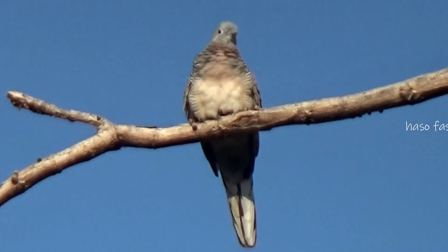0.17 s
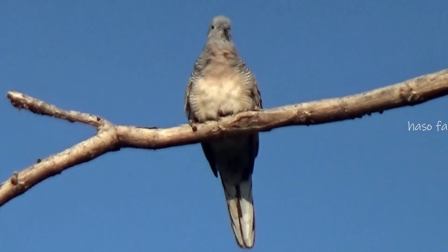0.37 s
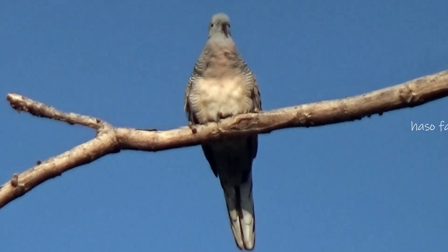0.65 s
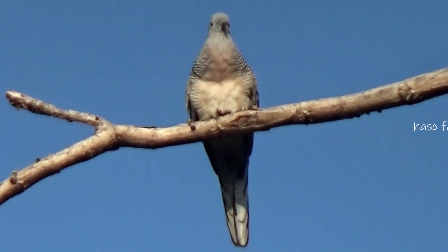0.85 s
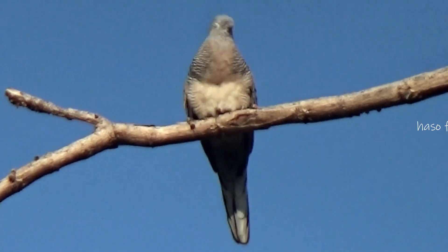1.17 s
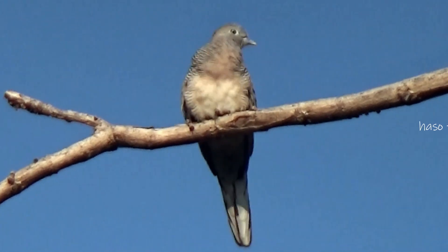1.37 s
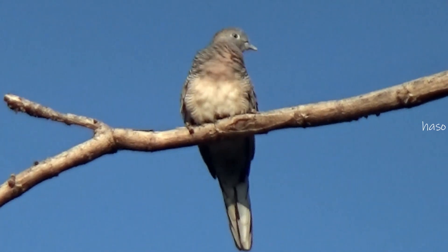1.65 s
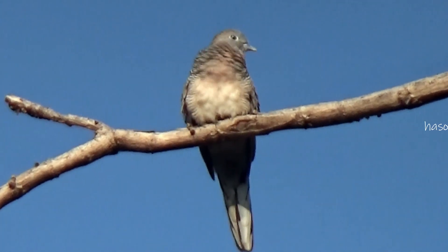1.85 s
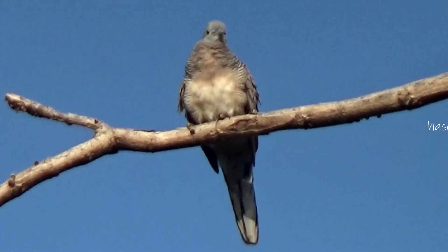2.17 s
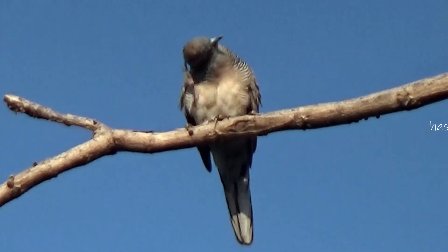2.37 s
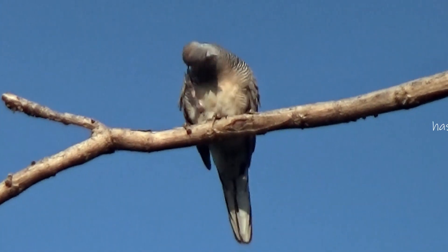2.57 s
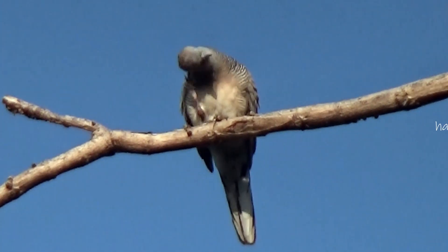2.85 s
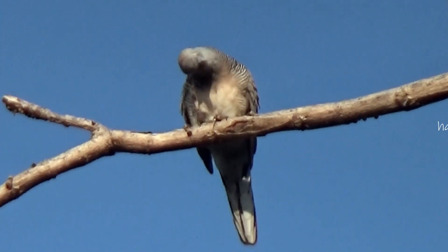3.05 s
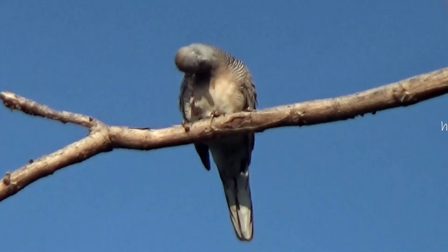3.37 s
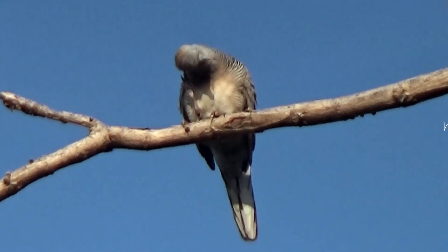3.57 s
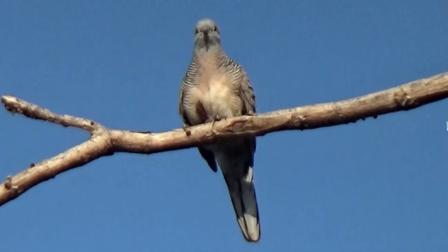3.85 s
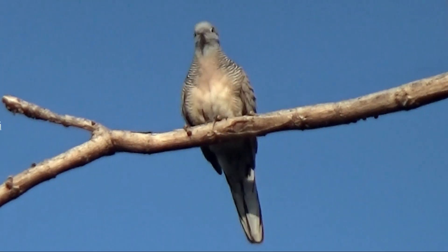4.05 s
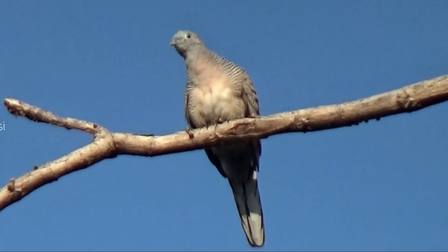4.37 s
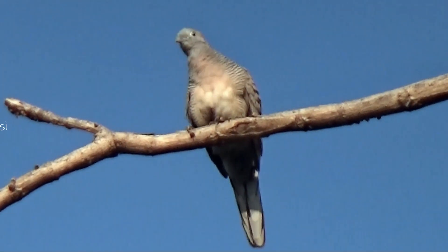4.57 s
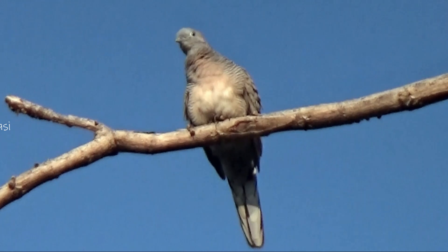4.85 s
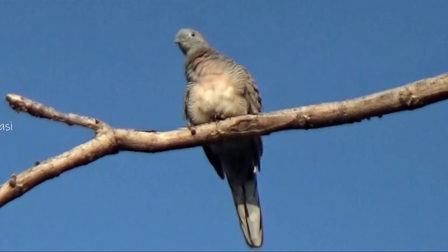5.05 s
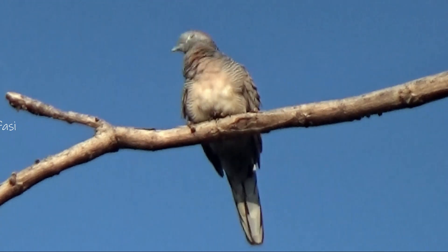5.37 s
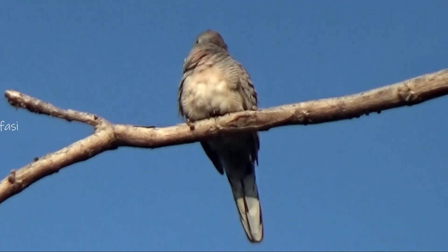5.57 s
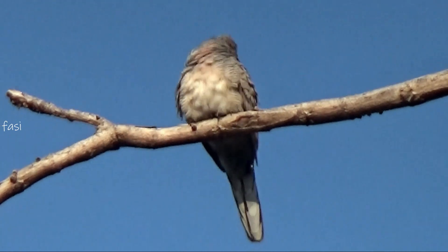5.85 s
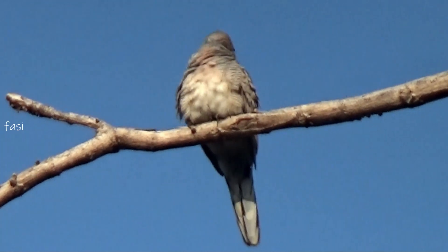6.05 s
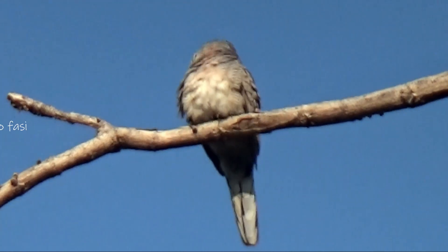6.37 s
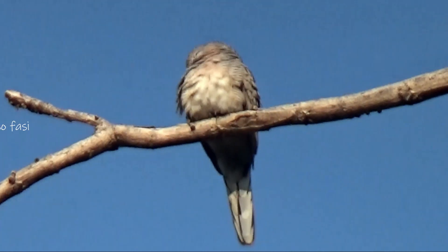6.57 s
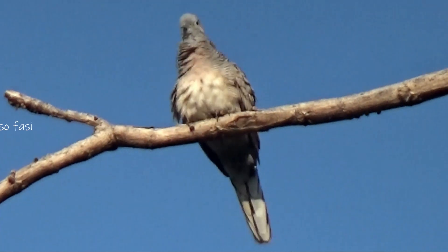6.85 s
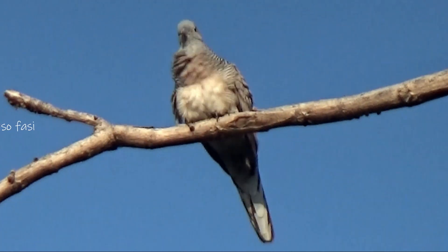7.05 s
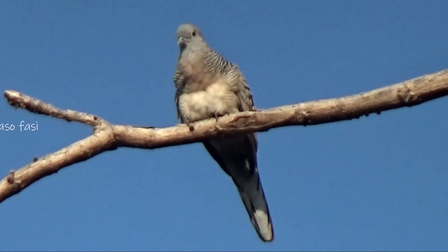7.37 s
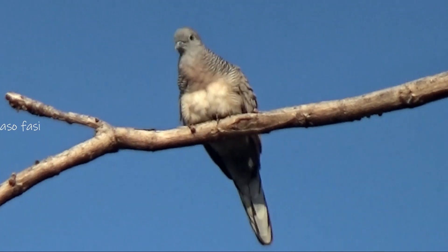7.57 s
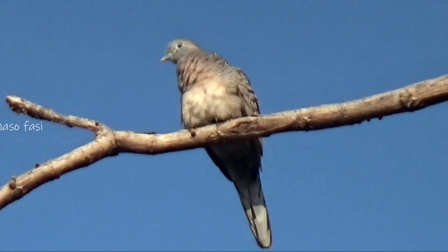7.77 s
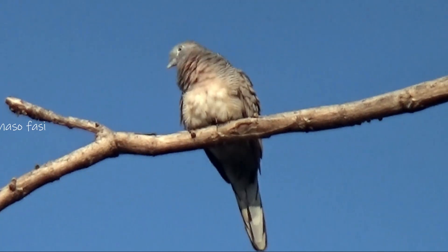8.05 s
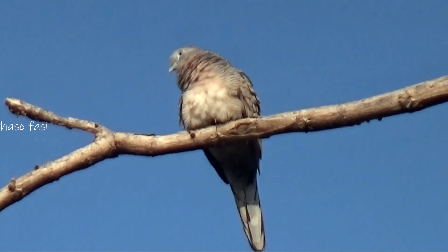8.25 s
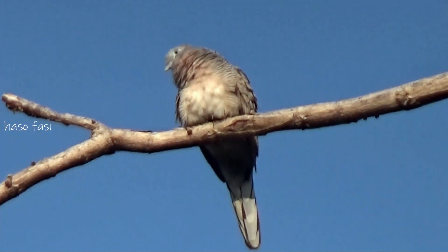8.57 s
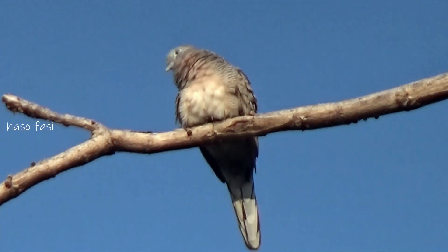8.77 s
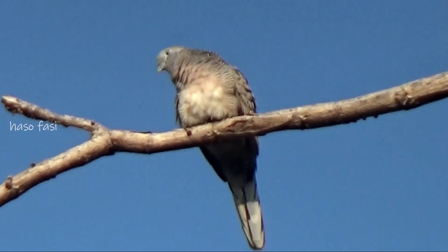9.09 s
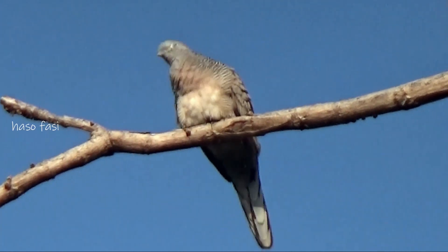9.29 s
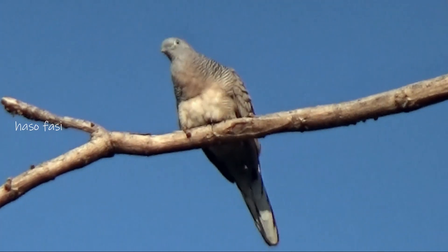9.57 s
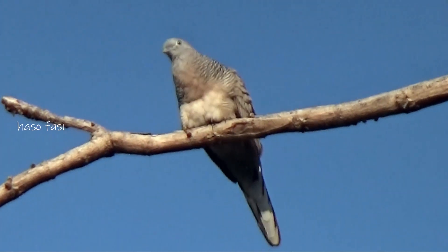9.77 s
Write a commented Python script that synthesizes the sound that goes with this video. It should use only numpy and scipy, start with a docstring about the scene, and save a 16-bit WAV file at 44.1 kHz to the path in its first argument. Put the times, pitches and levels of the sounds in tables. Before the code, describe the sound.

A near zebra dove gives three short, clear phrases, one early and two late, each a fluttering trill, several clipped notes and a longer final coo. A second dove answers twice, faintly from afar. Tiny birds chip and slide, insects rasp in even pulses, over soft outdoor air with a faint low traffic drone. The dove sounds close and dry, the rest softly scattered by trees.

```python
"""Zebra doves among trees

A near zebra dove coos three quick phrases and a second one calls twice from far off, each note a bent, almost pure tone.
Small birds chip, slide and whistle as gliding tones; insects rasp in pulses of coloured noise.
Blurred swells of filtered noise come from afar, over a steady outdoor wash and a low traffic drone."""
import sys
import numpy as np
from scipy import signal
from scipy.fft import rfft, irfft
from scipy.io import wavfile
from scipy.ndimage import uniform_filter1d

SR = 44100
rng = np.random.default_rng(int(sys.argv[2]) if len(sys.argv) > 2 else 0)


def wav_out(sig):
    """Save sig, one row per channel (or a flat mono array), as 16-bit PCM at SR to the path in sys.argv[1]."""
    wavfile.write(sys.argv[1], SR, np.round(np.clip(np.atleast_2d(sig).T, -1, 1) * 32767).astype(np.int16))


N = 437472
TIME = np.arange(N) / SR

# Colour of the still air. Each row: frequency in Hz, relative density in dB.
AIR = [(15, -27), (25, 1), (144, -1), (193, -4.5), (267, -9), (919, -13.5), (1900, -18.5), (2230, -15.5),
       (2770, -16.5), (3170, -10.5), (5580, -16.5), (7300, -21.5), (8350, -21), (11200, -31),
       (15500, -40.5)]
# Stereo width of every diffuse noise. Each row: frequency in Hz, side against middle in dB.
WIDTH = [(30, -43), (80, -47), (170, -17.5), (350, -9), (900, -4), (3000, -10.5), (6000, -12),
         (9000, -26.5), (13000, -50)]
# Swell of the distant traffic, before its trim. Each row: time in seconds, level in dB.
DRONE = [(0.0, -52.5), (1.85, -65), (2.02, -49), (6.13, -53), (6.19, -46), (9.92, -53)]
# Colour of the traffic drone. Each row: frequency in Hz, relative density in dB.
DRONE_COLOUR = [(60, -43), (105, -7), (131, 5), (160, -18.5), (300, -39.5)]
# Blurred far-off calls and bumps. Each row: start in seconds, fade length in seconds, centre in Hz,
# width in octaves, level in dB before the scatter.
FAR_SOUNDS = [(2.69, .15, 816, 0.67, -43.5), (3.2, .15, 795, .81, -47), (6.319, 0.37, 1380, .17, -49),
              (6.583, .14, 390, .1, -51.5), (7.538, .088, 2600, .26, -39.5),
              (7.544, 0.065, 1940, .055, -42), (7.725, .12, 1060, .1, -49), (7.719, 0.08, 338, .069, -47.5)]
# Bouts of evenly spaced insect rasps. Each row: middle of the first rasp in seconds, middle of the last in seconds,
# number of rasps, length of each in seconds, first level in dB, last level in dB.
RASP_BOUTS = [(.11, .548, 4, .08, -37, -34.5), (.812, 1.183, 3, 0.064, -40, -39),
              (1.275, 2.1, 6, .1, -37.5, -36.5), (2.323, 2.61, 3, 0.077, -35, -42),
              (2.91, 3.045, 2, .05, -48, -42.5), (3.153, 4.295, 6, 0.097, -40, -42),
              (4.466, 4.904, 3, 0.067, -36, -39), (5.443, 5.443, 1, .04, -37.5, -37.5),
              (5.71, 5.97, 3, .06, -48, -47.5), (6.715, 7.1, 3, .1, -36, -33),
              (7.255, 7.745, 3, 0.078, -30, -33), (7.932, 8.054, 2, .09, -33, -31.5),
              (8.301, 8.497, 2, 0.063, -32, -33), (8.758, 9.255, 3, 0.077, -34, -33),
              (9.505, 9.813, 3, 0.077, -33, -36.5)]
# Colours of strong and of faint rasps. Each row: frequency in Hz, relative density in dB.
RASP_LOUD = [(940, -43), (1600, -13.5), (1950, -10.5), (2150, -15.5), (2700, -9), (3550, -4.5),
             (3870, -0.5), (4680, -7.5), (5250, -4), (5720, 0), (7110, -18.5), (8200, -14), (10400, -13),
             (11900, -30), (15500, -41)]
RASP_FAINT = [(940, -77), (1600, -9.5), (1900, -4.5), (2450, -32), (2620, -7.5), (3910, 3.5), (4640, -3.5),
              (5660, -2), (7040, -18.5), (8200, -11.5), (9820, -12.5), (12100, -47), (15500, -22)]
# Faint distant whistles. Each row: start in seconds, length in seconds, first pitch in Hz, last pitch in Hz,
# level in dB at the middle.
WHISTLES = [(0, .3, 2754, 2530, -51.5), (.623, 0.21, 2720, 2480, -53.5), (1.069, .085, 2520, 2330, -52),
            (1.653, .15, 2270, 1960, -53), (2.16, .071, 2480, 2370, -52), (2.42, .084, 1275, 1260, -49.5),
            (2.746, .108, 2686, 2320, -51), (4.061, .049, 1146, 1150, -51), (4.965, .27, 2256, 2245, -56),
            (7.719, .1, 677, 668, -48), (7.899, .67, 651, 599, -56.5), (8.34, .13, 3330, 3210, -38.5),
            (8.79, .2, 2830, 2890, -46), (9.236, .27, 2713, 3020, -45), (9.578, 0.32, 2820, 2618, -48.5)]
# Thin slides of the small birds, one list each. Each row: time in seconds, pitch in Hz, level in dB.
SLIDES = [
    [(2.251, 9050, -41), (2.259, 7540, -33), (2.283, 6570, -30), (2.308, 5980, -35), (2.34, 4800, -47)],
    [(3.865, 7500, -39.5), (3.9, 6600, -35.5), (3.94, 5430, -44)],
    [(4.51, 8000, -35), (4.53, 6800, -44), (4.56, 6200, -51)],
    [(6.085, 4770, -49), (6.122, 4800, -41), (6.15, 5330, -32), (6.188, 6460, -29.5), (6.208, 6900, -35),
     (6.225, 7370, -27.5), (6.245, 7370, -34.5)],
    [(6.128, 7420, -43), (6.18, 6940, -50)],
]
# Arched chirps of a nearer bird. Each row: start in seconds, length in seconds, top pitch in Hz, level in dB.
CHIRPS = [(7.925, 0.056, 3890, -23), (8.252, 0.063, 3756, -24), (8.569, .06, 3730, -23.5),
          (8.865, 0.06, 3710, -22.5)]
# Shape of an arched chirp. Each row: share of the length, factor on the top pitch, relative level in dB.
ARCH = [(0, .7, -24), (.2, .77, -7), (.34, .92, -2), (.46, .99, 0), (.59, 1, 0), (.71, .95, -1),
        (.85, .83, -2), (1, .77, -10)]
# Sharp chips of a small bird. Each row: start in seconds, strength in dB before the trim, pitch in Hz.
CHIPS = [(0.675, -22, 7170), (0.8688, -26, 7300), (0.8823, -22, 6760), (0.9849, -21, 6980),
         (1.2665, -20.5, 7440), (1.8976, -24, 7250), (1.922, -23.5, 6560), (2.2025, -24.5, 6430),
         (2.4974, -24.5, 7000), (3.6586, -25, 6600), (3.795, -23.5, 7260), (4.0536, -23, 6390),
         (4.419, -23.5, 7320), (4.5165, -24, 7190), (4.684, -24.5, 7450), (4.8215, -25, 7400),
         (5.3077, -25, 7360), (5.7093, -26, 7510), (5.955, -26, 7340), (6.4144, -25.5, 6830),
         (6.7835, -24.5, 7070), (7.1861, -25, 7400), (7.8805, -25, 7060), (7.998, -21.5, 7800),
         (8.322, -24.5, 6800), (8.5939, -24, 6480), (9.084, -24, 6490), (9.4848, -25.5, 6320)]
# Shape of a chip's flick. Each row: share of the length, factor on the pitch, relative level in dB.
FLICK = [(0, 1.17, -16), (.28, 1.05, 0), (.55, .97, -1), (1, .77, -18)]
# Colour of a chip's noisy edge. Each row: frequency in Hz, relative density in dB.
SNAP = [(2500, -24), (4500, -8), (6500, -1), (9500, -12.5), (12000, -26), (15500, -36)]
# Shapes of the dove's notes. Each row: share of the note, factor on its top pitch, relative level in dB.
TRILL = [(0, .68, -12), (.03, .68, -7), (.075, .74, 0), (.205, .775, 1), (.245, .94, 1), (.29, .965, 1.5),
         (.38, .995, 0), (.5, .955, -3), (.62, 1.005, 0), (.72, .95, -4.5), (.8, .98, -.5), (.89, .99, -.3),
         (.96, .95, -2), (1, .87, -14)]
SLUR = [(0, .78, -16), (.1, .92, -2), (.27, .98, 0), (.48, 1, 0), (.72, .965, -2), (.87, .92, -8),
        (1, .87, -26)]
PIP = [(0, .86, -9), (.09, .82, 0), (.18, .85, 2), (.31, .96, -2), (.45, 1, -1.3), (.67, .975, -4),
       (.85, .93, -11), (1, .86, -27)]
COO = [(0, .81, -8.5), (.04, .8, 3), (.075, .89, 4), (.115, .96, -0.5), (.2, .99, -0.7), (.36, 1, -1.5),
       (.64, .98, -0.8), (.82, .93, -1.8), (.94, 0.84, -12.5), (1, 0.66, -25)]
# Phrase of the near dove, before stretching. Each row: start within the phrase in seconds, length in seconds,
# factor on the phrase's top pitch, relative level in dB, note shape.
NEAR_PHRASE = [(0, .12, 1, 0, TRILL), (.121, .039, .962, 0, SLUR), (.168, .037, .941, 0, PIP),
               (.230, .03, .908, -.7, PIP), (.305, .034, .912, -1, PIP), (.398, .103, .934, -3, COO)]
# Phrase of the far dove, which breaks the trill into separate notes. Each row: start within the phrase in seconds,
# length in seconds, factor on the phrase's top pitch, relative level in dB, note shape.
FAR_PHRASE = [(0, 0.034, .83, -5, SLUR), (.023, 0.041, 0.99, 0.5, PIP), (.069, 0.0323, .98, -2.5, PIP),
              (.104, 0.038, 0.98, -2, SLUR), (.146, 0.0384, 0.98, -1.5, PIP), (.191, .036, .94, -0.5, PIP),
              (.256, 0.03396, .91, 1, PIP), (.338, .098, .935, -1.5, COO)]
# Phrases of the near dove. Each row: start in seconds, time stretch as a factor, top pitch in Hz, level in dB,
# extra pause before the last coo in seconds.
NEAR_DOVE = [(.658, 1.0, 1321, -10, 0), (7.006, 1.036, 1322, -10.3, 0), (9.238, .979, 1332, -10.4, 0)]
# Phrases of the far dove, before its filter and trim. Each row: start in seconds, time stretch as a factor,
# top pitch in Hz, level in dB, extra pause before the last coo in seconds.
FAR_DOVE = [(5.695, 1.0, 1225, -30.5, 0), (8.015, 1.12, 1220, -31.5, .026)]


def amp(db):
    """Decibels to gain."""
    return 10 ** (np.asarray(db) / 20)


def unit(x):
    """Scales to rms 1."""
    return x / np.sqrt(np.mean(x ** 2) + 1e-20)


def read(points, hz):
    """Reads a spectrum on a log-frequency axis."""
    f, value = np.transpose(points)
    return np.interp(np.log(hz + 1), np.log(f + 1), value)


def add(mix, s, sound):
    """Mixes a sound in at time s."""
    part = mix[max(round(s * SR), 0):][:len(sound)]
    part += sound[:len(part)]


def waver(size, hz):
    """Smooth random drift of rms about 1, its spectrum rolling off around hz."""
    f = np.fft.rfftfreq(size + SR, 1 / SR)
    spectrum = rfft(rng.standard_normal(size + SR)) * np.exp(-(f / hz) ** 2)
    return unit(irfft(spectrum, size + SR))[:size]


def noise(spectrum):
    """Diffuse two-channel noise of the given colour, scaled to rms 1."""
    hz = np.fft.rfftfreq(N, 1 / SR)
    mid, side = rfft(rng.standard_normal((2, N))) * amp(read(spectrum, hz))
    side = side * amp(read(WIDTH, hz))
    return unit(irfft(np.array([mid + side, mid - side]), N))


def whistle(rows, jitter, shimmer_db, overtone_db=-50):
    """A nearly pure syrinx tone along rows of (s, Hz, dB), never quite steady in pitch or level."""
    s, hz, db = np.transpose(rows)
    t = np.arange(s[0], max(s[-1], s[0] + .004), 1 / SR)
    hz, db = (uniform_filter1d(np.interp(t, s, curve), size=90) for curve in (hz, db))
    phase = 2 * np.pi * np.cumsum(hz * (1 + jitter * waver(len(t), 230))) / SR
    edge = np.minimum(np.minimum(t - t[0], t[-1] - t) / .002, 1)  # 2 ms fades
    level = amp(db + shimmer_db * waver(len(t), 240)) * np.sin(edge * np.pi / 2) ** 2
    tone = np.sin(phase) + amp(overtone_db) * np.sin(2 * phase)
    return np.sqrt(2) * level * tone


def note(shape, s, length, hz, db):
    """Stretches a note shape to its time, pitch and level."""
    return np.array(shape) * [length, hz, 1] + [s, 0, db]


def trees(x, wet_db, t60, spread, delay=.0065, early_db=5, early_t60=.074):
    """Direct sound plus its scatter: a quick cloud from nearby leaves, then a longer tail from farther trunks."""
    t = np.arange(SR * 3 // 4) / SR
    leaves = amp(early_db - 60 * t / early_t60)
    trunks = amp(-60 * t / t60)
    decay = (trunks + leaves) * (t > delay)
    taps = rng.standard_normal((2, len(t))) * (rng.random((2, len(t))) < .1) * decay  # sparse echoes
    mid, side = taps / np.linalg.norm(taps, axis=1, keepdims=True)
    tails = np.array([mid + spread * side, mid - spread * side])
    return x + amp(wet_db) * signal.fftconvolve(x[None], tails, axes=1)[:, :N]


def patchy(x, patch_db, broad_share=.82):
    """Lets the colour of a hiss drift in narrow streaks and broad patches, some tens of ms long."""
    z = signal.stft(x, nperseg=1024, noverlap=768)[2]
    fine, broad = rng.standard_normal((2, *z.shape[1:]))
    for axis, (small, large) in enumerate([(2, 50), (4, 16)]):  # over frequency, then over time
        fine = uniform_filter1d(uniform_filter1d(fine, small, axis), small + 1, axis)
        broad = uniform_filter1d(broad, large, axis)
    gain = amp(patch_db * (unit(fine) + broad_share * unit(broad)))
    return signal.istft(z * unit(gain), nperseg=1024, noverlap=768)[1][:, :N]


def air(air_db=-43, drift_db=.82, drone_trim_db=-2.5):
    """Outdoor wash of gently wavering coloured noise, with a low band of noise for the traffic drone."""
    drone_db = np.interp(TIME, *np.transpose(DRONE)) + drone_trim_db
    drone = noise(DRONE_COLOUR) * amp(drone_db)
    return noise(AIR) * amp(air_db + drift_db * waver(N, 15)) + drone


def far_sounds(rise_s=.015, fade_db=16):
    """Bands of noise that swell quickly and die away, smeared by distance."""
    out = np.zeros(N)
    t, hz = np.arange(SR // 2) / SR, np.fft.rfftfreq(SR // 2, 1 / SR) + 1
    for s, length, centre_hz, width, db in FAR_SOUNDS:
        bell = np.exp(-(np.log2(hz / centre_hz) / width) ** 2 / 2)
        band = unit(irfft(rfft(rng.standard_normal(len(t))) * bell))
        fade = amp(db - fade_db * (t / length) ** 2)
        add(out, s, band * np.minimum(t / rise_s, 1) * fade)
    return trees(out, wet_db=-.5, t60=.82, spread=.31)


def rasps(slow_gap_s=.185, offbeat_db=-6.5, offbeat_s=.07, far_per_s=4, far_s=.06, far_db=-50.5):
    """Even bouts that swell or fade, soft offbeats in the slow ones, and stray far rasps: (middle s, length s, dB)."""
    rows = []
    for first, last, count, length, first_db, last_db in RASP_BOUTS:
        times, levels = np.linspace([first, first_db], [last, last_db], count).T
        rows += [(s, length, db) for s, db in zip(times, levels)]
        for s, gap, db in zip(times, np.diff(times), levels):
            if gap > slow_gap_s:  # a softer rasp falls in each pause
                rows.append((s + gap / 2, offbeat_s, db + offbeat_db))
    strays = np.cumsum(rng.uniform(.5, 1.5, size=100)) / far_per_s
    return rows + [(s, far_s, far_db) for s in strays[strays < N / SR]]


def insects(edge_s=.0093, loud_db=-33, faint_db=-42, grain_db=.44):
    """Bursts of fine rasping hiss; strong and faint ones blend between two noise colours."""
    loud, faint = np.zeros((2, N))  # power envelopes
    for s, length, db in rasps():
        near = slice(max(int((s - .25) * SR), 0), int((s + .25) * SR))
        power = amp(db) ** 2 / (1 + np.exp((abs(TIME[near] - s) - length / 2) / edge_s))
        share = np.clip((db - faint_db) / (loud_db - faint_db), 0, 1)
        loud[near] += share * power
        faint[near] += (1 - share) * power
    hiss = noise(RASP_LOUD) * np.sqrt(loud) + noise(RASP_FAINT) * np.sqrt(faint)
    return hiss * amp(grain_db * waver(N, 170))


def songbirds(ends_db=-3):
    """High slides, arched chirps and faint far whistles: gliding syrinx tones, each group with its own scatter."""
    high, near, far = np.zeros((3, N))
    for rows in SLIDES:
        add(high, rows[0][0], whistle(rows, jitter=.013, shimmer_db=2.5))
    for row in CHIRPS:
        add(near, row[0], whistle(note(ARCH, *row), jitter=.012, shimmer_db=2, overtone_db=-27))
    for s, length, first_hz, last_hz, db in WHISTLES:
        rows = [(s, first_hz, db + ends_db),
                (s + length / 2, (first_hz + last_hz) / 2, db),
                (s + length, last_hz, db + ends_db)]
        add(far, s, whistle(rows, jitter=.011, shimmer_db=3.5))
    high = trees(high, wet_db=-3, t60=.61, spread=.42)
    near = trees(near, wet_db=-4.5, t60=.42, spread=.5) * amp([[-.8], [.8]])  # slightly to the right
    far = trees(far, wet_db=-4, t60=.2, spread=.54)
    return high + near + far


def chips(gain_db=-7.5, length_s=.011, echo_s=.012, echo_db=-2, snap_db=-5, loud_db=-22, falloff=.85):
    """Very fast downward flicks with a noisy edge, each thrown back once by a nearby surface."""
    snap = noise(SNAP)[0]
    out = np.zeros(N)
    for s, db, hz in CHIPS:
        softness = falloff * min(db - loud_db, 0)  # a weak chip loses its edge faster than its tone
        flick = note(FLICK, s, length_s * rng.uniform(.75, 1.3), hz, db + gain_db + softness)
        chip = whistle(flick, jitter=.025, shimmer_db=2)
        edge_gain = amp(db + gain_db + snap_db + 1.5 * softness)
        edge = edge_gain * snap[int(s * SR):][:1000] * np.hanning(1000)
        for delay, gain in ((0, 1), (echo_s, amp(echo_db))):
            add(out, s + delay, gain * chip)
            add(out, s + delay - .003, gain * edge)
    return trees(out, wet_db=1, t60=.34, spread=.22)


def phrase_notes(phrase, deliveries):
    """Lays out a dove's phrase each time at its own pace, pitch and strength: (start s, length s, Hz, dB, shape)."""
    notes = []
    for start, stretch, top_hz, level_db, pause in deliveries:
        for s, length, pitch, db, shape in phrase:
            note_start = start + stretch * s + pause * (shape == COO)
            notes.append((note_start, stretch * length, top_hz * pitch, level_db + db, shape))
    return notes


def dove(phrase, deliveries, stutter_db=-9.5, stutter_hz=230, catch_hz=1100):
    """Syrinx tones bend along each note's shape; after a pause the membrane first stutters into motion."""
    out, last_end = np.zeros(N), 0
    t = np.arange(-.012, .005, 1 / SR)  # seconds around the note's start
    swell = np.interp(t, [t[0], -.008, -.001, t[-1]], [0, .4, 1, 0])
    for s, length, hz, db, shape in phrase_notes(phrase, deliveries):
        add(out, s, whistle(note(shape, s, length, hz, db), jitter=.007, shimmer_db=.35))
        if s - last_end > .022:
            rate = stutter_hz * rng.uniform(.85, 1.15)
            beats = np.sin(np.pi * rate * t + rng.uniform(0, np.pi)) ** 2
            turns = np.cumsum(catch_hz * (1 + .06 * waver(len(t), 200))) / SR
            stutter = swell * (beats + .25) * np.sin(2 * np.pi * turns)
            add(out, s + t[0], np.sqrt(2) * amp(db + stutter_db) * stutter)
        last_end = s + length
    return out


def scene():
    """Both doves among the other birds and insects, over the outdoor wash."""
    wash = patchy(air(), patch_db=.7)
    hiss = patchy(insects(), patch_db=2.6)
    carrying = signal.butter(2, [990, 1240], "bandpass", fs=SR, output="sos")  # only the tops of the notes carry far
    distant = signal.sosfilt(carrying, dove(FAR_PHRASE, FAR_DOVE)) * amp(-1)
    far = trees(distant, wet_db=-5.5, t60=.6, spread=.27)
    near = trees(dove(NEAR_PHRASE, NEAR_DOVE), wet_db=-29, t60=.39, spread=.13)
    return wash + far_sounds() + hiss + songbirds() + chips() + far + near


def record(dry, bass_hz=33, edge_hz=15720):
    """The microphone's bass roll-off and the recorder's band limit."""
    thin = signal.sosfilt(signal.butter(4, bass_hz, "highpass", fs=SR, output="sos"), dry)
    band_limit = signal.firwin(511, edge_hz, window=("kaiser", 9), fs=SR)
    return signal.oaconvolve(thin, band_limit[None], "same")


dry = scene()
out = record(dry)
wav_out(out)
```